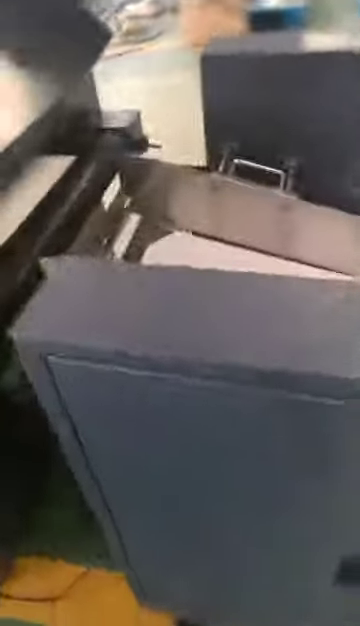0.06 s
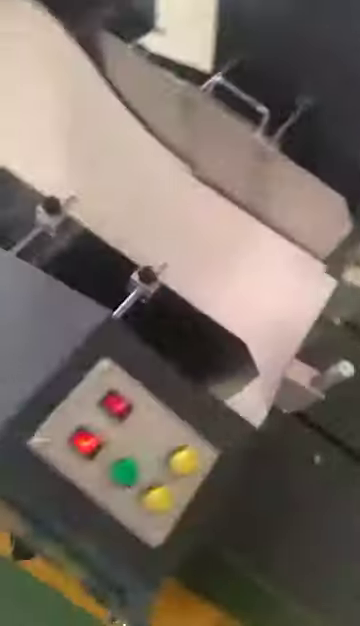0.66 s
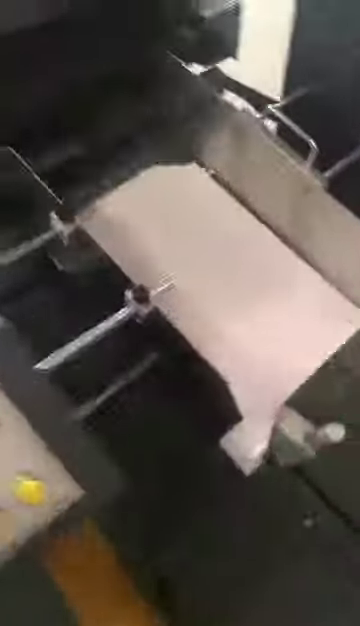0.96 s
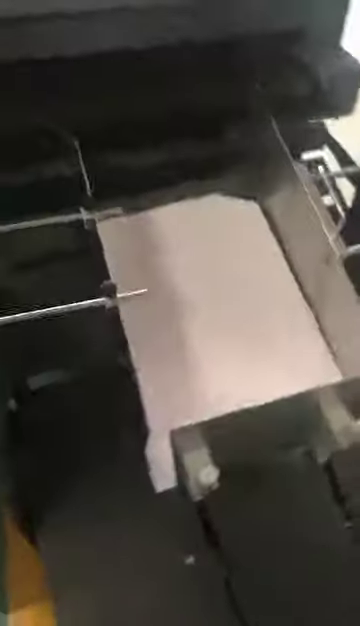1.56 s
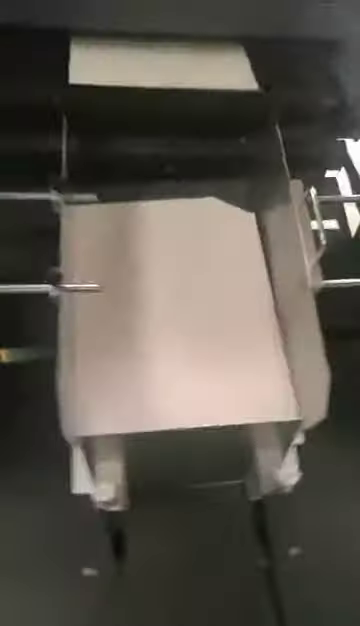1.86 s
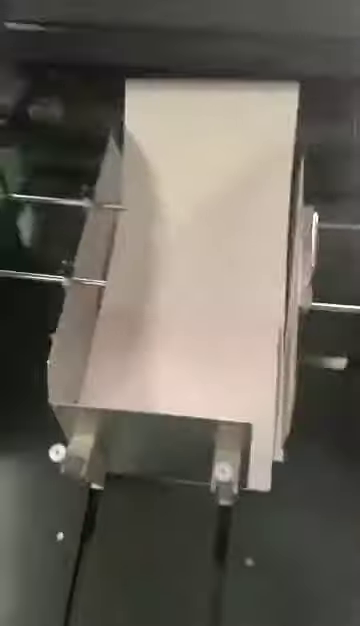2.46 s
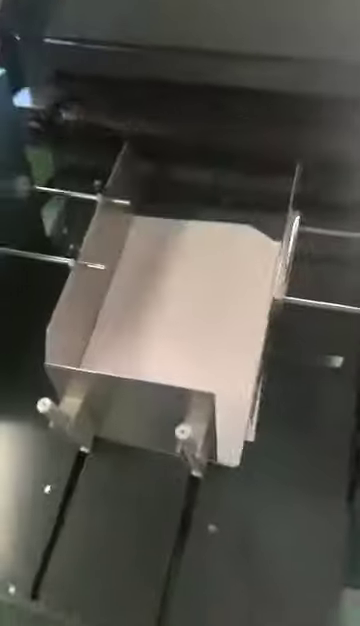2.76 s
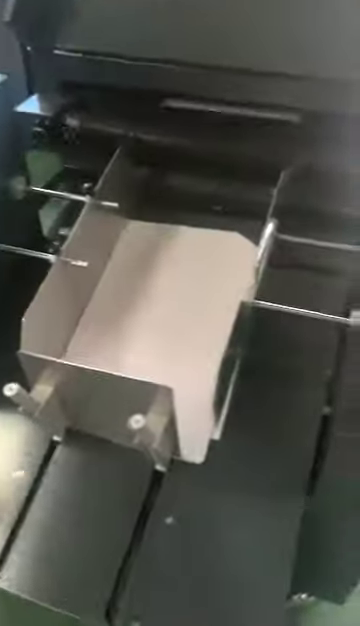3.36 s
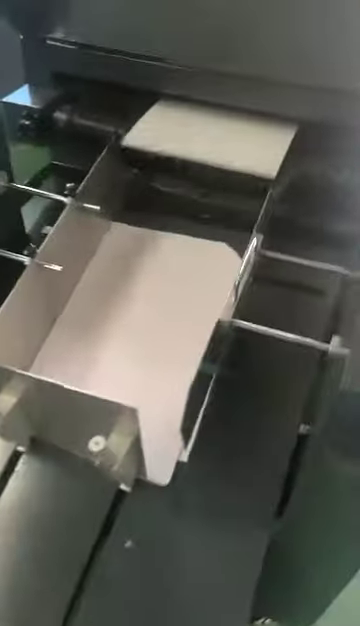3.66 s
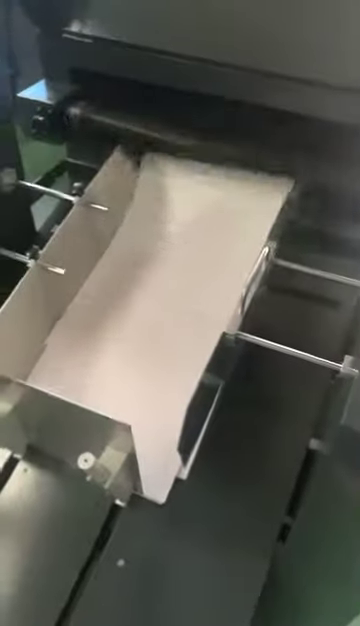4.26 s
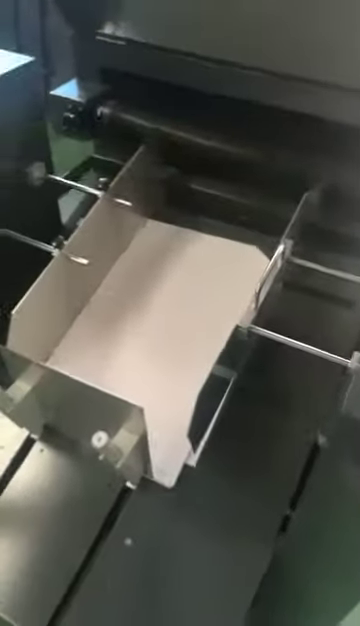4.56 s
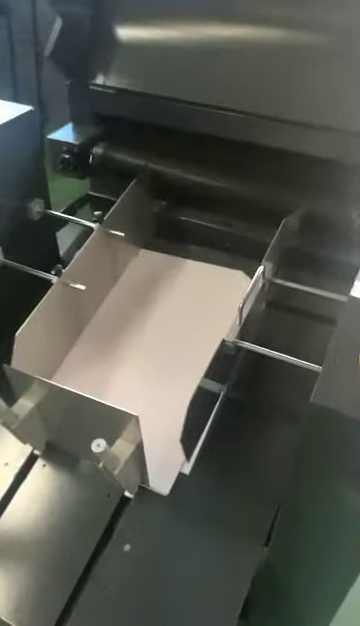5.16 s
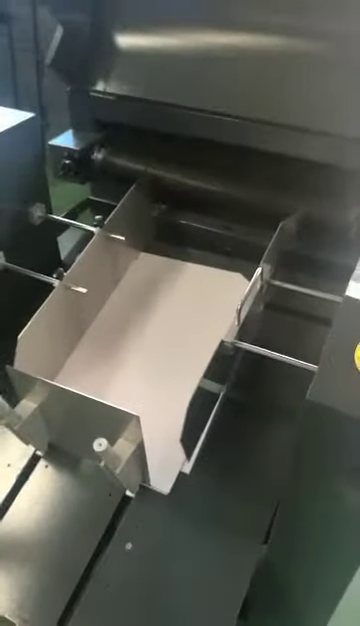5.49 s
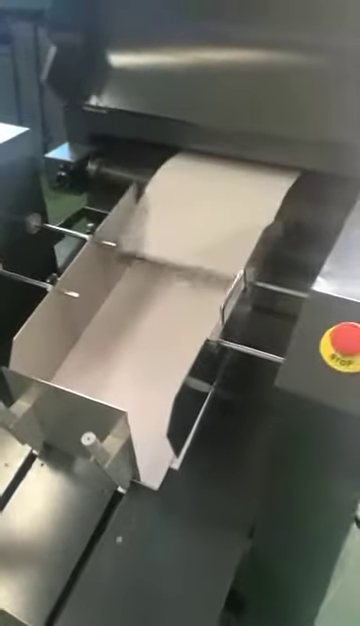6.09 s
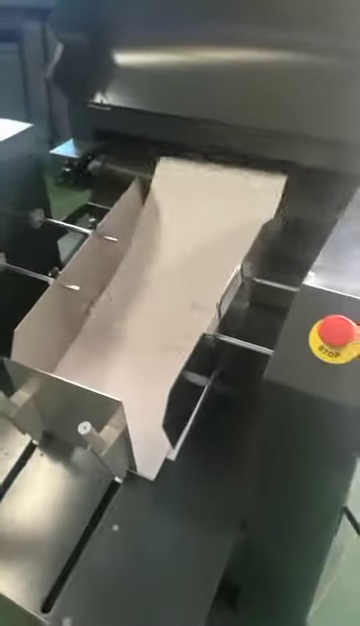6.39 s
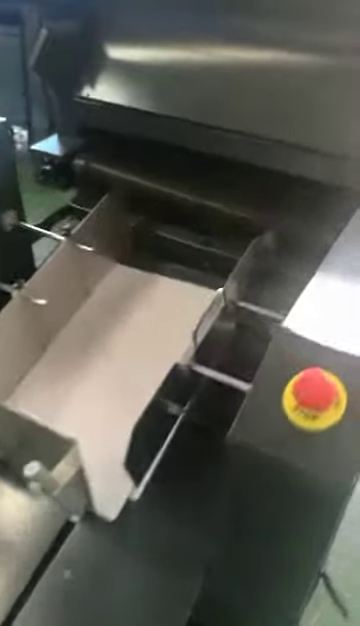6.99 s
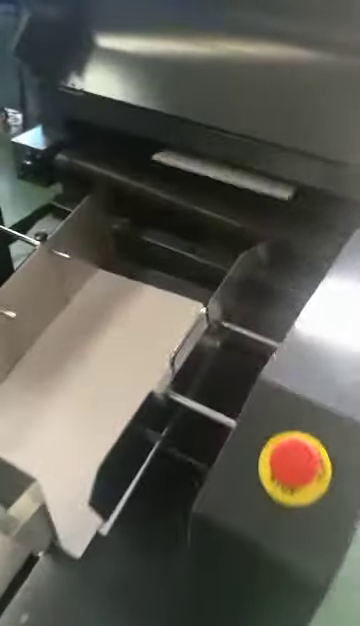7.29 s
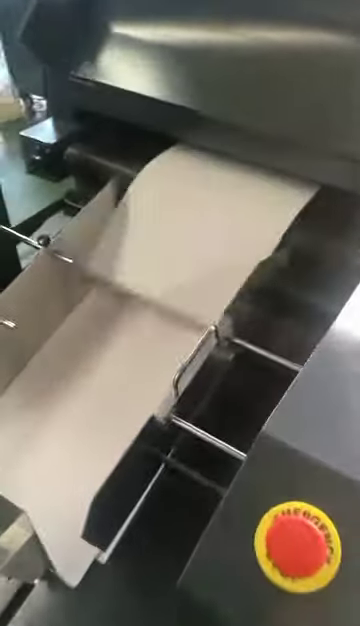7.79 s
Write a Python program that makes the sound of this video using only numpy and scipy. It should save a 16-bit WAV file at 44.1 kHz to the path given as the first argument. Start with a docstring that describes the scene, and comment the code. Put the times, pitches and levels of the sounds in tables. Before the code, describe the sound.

A paper feeding machine runs throughout, heard close up from above its steel tray in a workshop. Rollers rumble, a fan rushes steadily and a motor hums faintly. Five sharp metallic clacks land evenly, at about 0.9, 2.6, 4.3, 6.5 and 8.2 seconds, with one slightly longer gap before the fourth. Each has a brief steel ring and a short room echo; the second is the hardest and the fourth is softer. About 0.7 seconds before each clack, a valve ticks and an air jet starts with a small puff, hissing until the clack while the rumble grows a little. Paper rustles and rasps over the rollers from the start until about 4.4 seconds, and again from 6.6 to 8.3 seconds, with a few bright swishes of sheet on sheet. Light stray ticks are scattered through, and a low drone swells softly near the end.

```python
"""Paper feeder and steel tray

A machine feeds five sheets into a steel tray, heard from a phone just above it. Paper rustles over
the rollers, an air jet hisses while each sheet runs out, and the mechanism clacks against its stop.
The steel rings and the workshop echoes. Underneath, rollers rumble, a fan rushes and a motor hums."""
import sys
import numpy as np
from scipy import signal
from scipy.fft import rfft, irfft, next_fast_len
from scipy.io import wavfile
from scipy.ndimage import uniform_filter1d

SR = 44100
rng = np.random.default_rng(int(sys.argv[2]) if len(sys.argv) > 2 else 0)


def dump(signal):
    """Clip the signal to [-1, 1] and save it as 16-bit WAV at the path in sys.argv[1]."""
    limited = np.clip(np.atleast_2d(signal).T, -1, 1)
    pcm = np.round(limited * 32767).astype(np.int16)
    wavfile.write(sys.argv[1], SR, pcm)


N = 398663
TIME = np.arange(N) / SR
VALVE_OPENS_S, VALVE_SHUTS_S = 0.708, 0.016  # how long before each clack
MIC_LAG_SAMPLES = 26  # direct sound reaches the left microphone later


def gain(db):
    """Turn decibels into a number to multiply by."""
    return 10 ** (np.asarray(db) / 20)


def unit(x):
    """Scale a signal to an average (rms) size of 1."""
    return x / np.sqrt(np.mean(x ** 2))


def at_pitch(table, hz):
    """Read between the rows of a (pitch_hz, value) table."""
    pitches, values = np.transpose(table)
    return np.interp(np.log(np.maximum(hz, 1)), np.log(pitches), values)


def pan(left_db):
    """Two gains that make the left side left_db louder than the right."""
    return gain(np.array([[1], [-1]]) * left_db / 2)


def ramp(t, length_s):
    """Rise from 0 to 1 over length_s, then stay there."""
    return np.clip(t / max(length_s, .001), 0, 1)


def fade(t, fade_s):
    """Die away, losing 60 dB every fade_s."""
    return np.exp(-np.log(1000) * t / max(fade_s, .001))


def swell(peak_s, width_s):
    """A smooth, bell-shaped rise and fall."""
    return np.exp(-((TIME - peak_s) / width_s) ** 2 / 2)


def wobble(rate_hz):
    """Glide between random values about 1 in size."""
    step = int(SR / rate_hz)
    held = np.repeat(rng.standard_normal(N // step + 1), step)
    return unit(uniform_filter1d(held, step)[:N])


# How much louder each pitch is on the left: pitch_hz, left_db
SIDE_BALANCE = [(100, 1), (330, -2), (700, 1.5), (1300, 0), (2800, -3.5), (4500, -2), (7500, 3),
                (14000, 3.5)]
def noise(tone, size=N, shared=0., lag=0, balance=True):
    """Stereo noise with a given tone: part reaches both microphones, part differs at each."""
    n = next_fast_len(size, True)
    hz = np.arange(n // 2 + 1) * SR / n
    white = rfft(rng.standard_normal((3, n)))
    bass = 1 / (1 + (hz / 330) ** 6)  # long waves reach both microphones alike
    share = np.clip(shared + (1 - shared) * bass, 0, 1)
    direct = white[2] * np.exp(-2j * np.pi * np.outer([lag, 0], hz) / SR)
    both = np.sqrt(share) * direct + np.sqrt(1 - share) * white[:2]
    sides = pan(at_pitch(SIDE_BALANCE, hz) * balance)
    return unit(irfft(both * gain(at_pitch(tone, hz)) * sides, n)[:, :size])


# The feed that leads up to each clack:
# jet_db, jet_drop_db, jet_left_db, duct_db, valve_db, flick_db, latch_db, load_db, spit_db
SHEET_FEEDS = [(-35.5, 0.5, 5.3, -45, -42, -28.5, -37, 5.3, -30),
               (-29.5, 7.6, 1.5, -45.5, -28, -29.5, -37, 1.6, -30),
               (-33, 6.5, 1, -46.5, -34, -32, -42, 3.1, -36),
               (-36.5, 4, 2.5, -49.5, -44, -33, -28.5, 1.3, -38),
               (-32.5, 4.6, 1.5, -47, -33, -28, -27.5, 0.87, -30)]
def feeds():
    """Each feed's row, with the time of its clack in front."""
    return [(blow[0], *feed) for blow, feed in zip(BLOWS, SHEET_FEEDS)]


# Fan and rumble are louder where the phone is nearer: time_s, level_db
BACKGROUND_LEVEL = [(0, -36.5), (1.3, -38), (2.3, -35.5), (3.3, -41), (4.4, -39.5), (5.75, -40.5),
                    (6.6, -39.5), (7.3, -35.5), (8.3, -34.5), (8.62, -36.5), (9.04, -34)]
def background_db():
    """The level that the fan and the rumble both follow."""
    return np.interp(TIME, *np.transpose(BACKGROUND_LEVEL))


# The rollers' deep tone: pitch_hz, level_db
RUMBLE_TONE = [(20, -32), (45, -15), (75, -11.5), (100, -3), (165, 0), (230, -1), (310, -4.5), (400, -11),
               (600, -35), (1200, -44)]
def roller_rumble(idle_db=-6, throb_db=0.83, take_up_s=0.19, let_go_s=0.16):
    """Rollers rumble all the time, and harder while they pull a sheet."""
    load_db = 0
    for clack_s, *_, extra_db, _ in feeds():
        taken_up = ramp(TIME - clack_s + VALVE_OPENS_S, take_up_s)
        let_go = ramp(TIME - clack_s + VALVE_SHUTS_S, let_go_s)
        load_db += extra_db * taken_up * (1 - let_go)
    return noise(RUMBLE_TONE) * gain(background_db() + idle_db + load_db + throb_db * wobble(10))


# Swells of a low drone: peak_s, level_db, pitch_hz, width_s
DRONE_SWELLS = [(.72, -46.5, 175, 0.17), (6.12, -45.5, 215, .09), (7.7, -44, 170, 0.23),
                (8.22, -42, 168, 0.15), (8.9, -47, 170, .12)]
def drone():
    """A low drone comes and goes."""
    out = 0
    for peak_s, db, hz, width_s in DRONE_SWELLS:
        tone = [(hz / 4, -90), (hz / 1.45, -30), (hz, 0), (hz * 1.6, -30), (hz * 4, -90)]
        out += noise(tone) * gain(db) * swell(peak_s, width_s)
    return out


# The fan's rushing tone: pitch_hz, level_db
FAN_TONE = [(150, -28), (400, 1.5), (650, -1.5), (950, 2), (1400, 3.5), (1750, 2.5), (1880, 5), (2050, 1),
            (3000, -1), (4700, -2), (8000, -8), (16000, -13)]
def fan(flutter_db=1.04):
    """The fan pushes air with a slightly fluttering rush."""
    rush = noise(FAN_TONE, shared=0.16, lag=MIC_LAG_SAMPLES)
    return rush * gain(background_db() + flutter_db * wobble(15))


# The motor's notes: pitch_hz, level_db
MOTOR_NOTES = [(50, -72), (100, -56), (301, -58.5), (1879, -60.5)]
def motor_hum(waver_db=2.0):
    """The motor hums a few pure notes that waver a little."""
    out = 0
    for hz, db in MOTOR_NOTES:
        level = gain(db + waver_db * wobble(5.7))
        out += level * unit(np.sin(2 * np.pi * hz * TIME + .5 * wobble(7.2)))
    return out


# The tone of sliding paper: pitch_hz, level_db
PAPER_TONE = [(300, -16), (800, -26), (1300, -4.5), (1900, -2.5), (2900, 0), (4000, -0.5), (5200, -2.5),
              (7500, -9.5), (11000, -16.5), (16000, -30)]
# Runs over the rollers: start_s, end_s, level_db, speed_up_s, drop_db, coast_db_per_s
PAPER_RUNS = [(-.3, 0.873, -37.5, 0.83, -0.5, 41), (0.963, 2.418, -36, 0.26, -2, 46),
              (2.893, 4.38, -43, 0.033, -8, 20), (6.648, 8.3, -31.5, 0.42, 12.5, 16)]
# Rasps of tight paper: start_s, end_s, level_db, drop_db, pitch_hz
PAPER_RASPS = [(0.206, 0.447, -34, 5, 3540), (1.489, 1.62, -35, -3, 3520), (2.119, 2.21, -34.5, 0, 4000),
               (2.895, 3.25, -41.5, 1.5, 4200), (3.512, 3.85, -41, -1.5, 3000), (4.14, 4.336, -37, 0, 3740),
               (6.96, 7.117, -33, 1, 3700), (7.17, 7.402, -34, 3.5, 3300)]
def paper(idle_db=-50.5, grain_db=0.66, drag_db=1.0, rasp_rise_s=0.019, rasp_tail_s=0.068):
    """Fibres catch and slip on the rollers: a grainy rustle that rasps when the paper is tight."""
    power = gain(idle_db) ** 2
    for start_s, end_s, db, speed_up_s, drop_db, coast_db_per_s in PAPER_RUNS:
        sag_db = drop_db * ramp(TIME - start_s, end_s - start_s)
        coast_db = coast_db_per_s * np.maximum(TIME - end_s, 0)
        power += (ramp(TIME - start_s, speed_up_s) * gain(db - sag_db - coast_db)) ** 2
    rustle = noise(PAPER_TONE, shared=0.035, lag=MIC_LAG_SAMPLES) * np.sqrt(power)
    t = np.arange(SR * 3 // 4) / SR
    for start_s, end_s, db, drop_db, hz in PAPER_RASPS:
        tone = [(hz / 6, -40), (hz / 2, -20), (hz * 0.8, 0), (hz * 1.32, 0), (hz * 2, -20), (hz * 4, -40)]
        grip = ramp(t, rasp_rise_s) * gain(db - drop_db * ramp(t, end_s - start_s))
        tail = np.exp(-np.maximum(start_s + t - end_s, 0) / rasp_tail_s)
        add(rustle, start_s, noise(tone, len(t)) * grip * tail)
    return rustle * gain(grain_db * wobble(500) + drag_db * wobble(22))


def add(out, start_s, sound):
    """Mix a sound in, beginning at start_s."""
    i = max(int(start_s * SR), 0)
    out[:, i:i + sound.shape[1]] += sound[:, :max(N - i, 0)]


# The tone of sheet on sheet: pitch_hz, level_db
SWISH_TONE = [(500, -25), (2000, -5), (4500, 0), (8000, 4), (11000, -5.5), (16000, -14)]
# Sheets skimming off the stack: peak_s, level_db, width_s
SKIMS = [(1.634, -37.5, 0.049), (1.835, -38.5, 0.056), (3.046, -42.5, 0.06), (6.995, -42, 0.1)]
def swishes():
    """Sheet rubs on sheet with a bright hiss that swells and fades."""
    return noise(SWISH_TONE) * sum(gain(db) * swell(peak_s, width_s) for peak_s, db, width_s in SKIMS)


# Tones of the jet, its hollow duct, the sheet's flick and the first spit of air: pitch_hz, level_db
JET_TONE = [(200, -9), (600, -12), (1000, -6), (2000, -7), (3200, -1), (5200, 5.5), (7500, 2), (12000, 2.5),
            (15500, 2)]
DUCT_TONE = [(200, -16), (460, -1.5), (570, -6), (730, -1), (950, -3.5), (2500, -29), (6000, -45)]
FLICK_TONE = [(300, -5), (1400, 7), (4000, 8), (7000, 5), (16000, -1)]
SPIT_TONE = [(500, -6), (1500, 4), (3500, 6), (6500, 6), (10000, -7), (16000, -9)]
def air_jet(leak_db=-44, open_s=0.022, close_s=0.016, puff_db=5, puff_s=0.055, flutter_db=0.95):
    """A valve opens with a spit and a hollow puff; the hiss weakens as the pressure falls."""
    # a weak leak hisses until the first blast
    flow = gain(leak_db) * pan(6) * (1 - ramp(TIME - BLOWS[0][0] + VALVE_OPENS_S, open_s))
    hollow, flick, spit = 0, 0, 0
    for clack_s, jet_db, drop_db, left_db, duct_db, _, flick_db, _, _, spit_db in feeds():
        on_s, off_s = clack_s - VALVE_OPENS_S, clack_s - VALVE_SHUTS_S
        age = np.clip(TIME - on_s, 0, off_s - on_s)
        valve = ramp(age, open_s) * np.clip((off_s - TIME) / close_s + .5, 0, 1)
        pressure = valve * gain(-drop_db * age / (off_s - on_s))
        flow += pressure * gain(jet_db) * pan(left_db)
        hollow += pressure * gain(duct_db + puff_db * np.exp(-age / puff_s))
        flick += gain(flick_db) * swell(clack_s - 0.051, 0.014)  # the sheet's tail crosses the jet
        spit_age = np.maximum(age - 0.014, 0)  # air spits just after the valve clicks
        spit += gain(spit_db) * valve * ramp(spit_age, .003) * fade(spit_age, .35)
    jet = noise(JET_TONE, shared=0.048, balance=False) * flow * gain(flutter_db * wobble(40))
    duct = noise(DUCT_TONE, shared=0.91, lag=MIC_LAG_SAMPLES) * hollow * pan(4)
    return jet + duct + noise(FLICK_TONE) * flick + noise(SPIT_TONE) * spit


def contact_tone(hz):
    """The tone of a light touch, strongest around one pitch."""
    return [(hz / 8, -40), (hz / 2, -10), (hz, 0), (hz * 2, -20), (hz * 8, -40)]


# Stray ticks of paper edges and moving parts: start_s, level_db, pitch_hz, fade_s
STRAY_TICKS = [(0.232, -38, 500, 0.14), (0.634, -23, 3580, 0.027), (1.235, -39, 800, .09),
               (4.044, -29, 2300, 0.025), (6.262, -27.5, 4200, 0.015), (6.46, -38, 1500, 0.2),
               (6.856, -38, 1320, 0.2), (7.043, -24, 3500, .02), (7.51, -36.5, 650, 0.27),
               (7.937, -28, 3500, .02)]
def ticks(valve_hz=3180, valve_fade_s=0.068, valve_lead_s=.002):
    """Light touches ring briefly: stray ones, and the valve each time it opens."""
    out, t = np.zeros((2, N)), np.arange(SR // 5) / SR
    valve_ticks = [(clack_s - VALVE_OPENS_S - valve_lead_s, valve_db, valve_hz, valve_fade_s)
                   for clack_s, _, _, _, _, valve_db, *_ in feeds()]
    for start_s, db, hz, fade_s in list(STRAY_TICKS) + valve_ticks:
        add(out, start_s, gain(db) * noise(contact_tone(hz), len(t)) * fade(t, fade_s))
    return out


def latch_squeak(pitch_hz=1326, lead_s=.026, slip_s=0.0036, scrape_db=-5):
    """A latch slips with a tiny, scratchy squeak just before each clack."""
    slip = sum(gain(db) * swell(clack_s - lead_s, slip_s) for clack_s, *_, db, _, _ in feeds())
    scrape = gain(scrape_db) * noise(contact_tone(pitch_hz))
    return slip * (np.sin(2 * np.pi * pitch_hz * TIME) + scrape)


# The notes of the steel frame and tray: pitch_hz, level_db, fade_s, left_db
STEEL_NOTES = [(617, -8, 0.041, 4.5), (680, -5, 0.043, 1.5), (777, -11, 0.1, 12), (905, 0, 0.052, 13.5),
               (1050, -10, 0.022, 7), (1236, 0.5, 0.044, 12.5), (1232, -5.5, 0.055, 6),
               (1335, 0, 0.068, -2), (1695, -16, 0.057, 18), (1875, -3.5, 0.1, -6), (2163, -8.5, 0.099, 2),
               (2280, -6, 0.033, 27), (2423, -9, 0.059, -10), (2556, -4, 0.091, -9), (2800, -3, 0.04, -12),
               (3095, -5, 0.052, -4), (3050, -11.5, 0.055, 19), (3760, -4, 0.046, -9),
               (4006, -11, 0.05, -19), (4040, -18, 0.017, 20), (5440, -15, 0.081, 1)]
# Low notes swing opposite ways at the two microphones, middle ones together: pitch_hz, left_lead_rad
STEEL_PHASES = [(600, 3.5), (900, 2.5), (1220, -0.3), (2100, 0.5), (2700, 1.2), (3800, 1.8)]
def steel_ring(t, blow_tone, stretch, mistune=0.011, spread_rad=0.25, stagger_rad=1.32):
    """Struck steel rings with many notes, each a little behind the one before."""
    out = 0
    for k, (hz, db, fade_s, left_db) in enumerate(STEEL_NOTES):
        detune, skew = rng.standard_normal(2)
        phase = 2 * np.pi * hz * (1 + mistune * detune) * t - k * stagger_rad
        lead = at_pitch(STEEL_PHASES, hz) / 2 + spread_rad * skew
        swing = np.sin([phase + lead, phase - lead])
        out += gain(db + at_pitch(blow_tone, hz)) * pan(left_db) * fade(t, fade_s * stretch) * swing
    return out


# Tones of a clack's ringing panels, thump, snap, high crack and room echo: pitch_hz, level_db
PANEL_TONE = [(200, -32), (520, -12.5), (800, 0), (1300, 2), (2600, 0.5), (4200, -5.5), (6000, -13),
              (9000, -21.5)]
THUMP_TONE = [(25, -24), (190, -1), (430, 0), (900, -17), (2500, -45)]
SNAP_TONE = [(400, -26), (1300, 0), (2600, 3), (3800, 5), (6000, -9), (12000, -31)]
CRACK_TONE = [(1000, -32), (4000, -13), (5600, 9.5), (7800, 3), (11000, 4.5), (16000, 1.5)]
ECHO_TONE = [(150, -12), (480, -7), (750, 1), (1250, 8), (2300, 2.5), (4000, -8), (9000, -47)]
# Blows against the stop: start_s, ring_low_db, ring_mid_db, ring_high_db, ring_top_db,
# ring_stretch (a multiplier), thump_db, crack_db, echo_db, bounce_s, snap_db
BLOWS = [(0.8997, -3, 0.5, -18, -10.5, 0.61, -36, -26, -34, 0.003, -24),
         (2.6082, -8, -3.5, 0.5, -6.5, 0.8, -16.5, -17, -28, 0.0057, -12),
         (4.3131, -12, -23, -18, -12.5, 1.38, -27, -18.5, -40, 0.0057, -11),
         (6.5244, -9, -11, -13.5, -12.5, 0.92, -29, -31, -34, 0.0045, -18),
         (8.2002, -8.5, -18.5, -12.5, -4.5, 1.08, -29, -20.5, -34, .0026, -8)]
def clacks(steel_db=-8, panel_db=-4.5, bounce_db=-13):
    """Each blow snaps, thumps the body, rings frame and panels, bounces once and echoes in the room."""
    out, t = np.zeros((2, N)), np.arange(SR * 3 // 4) / SR
    for start_s, *ring_db, stretch, thump_db, crack_db, echo_db, bounce_s, snap_db in BLOWS:
        # no two blows land alike, so each favours different notes
        blow_tone = list(zip([726, 1170, 2020, 3350], ring_db))
        strength = np.sqrt(np.mean(gain(ring_db) ** 2))
        panel_tone = [(hz, db + at_pitch(blow_tone, hz)) for hz, db in PANEL_TONE]
        panels = gain(panel_db) * strength * noise(panel_tone, len(t)) * fade(t, 0.12 * stretch)
        thump = gain(thump_db) * noise(THUMP_TONE, len(t)) * fade(t, 0.044)
        snap = gain(snap_db) * noise(SNAP_TONE, len(t)) * fade(t, 0.012)
        steel = gain(steel_db) * steel_ring(t, blow_tone, stretch)
        hit = (steel + panels + thump + snap) * (1 - np.exp(-t / 0.00043))
        crack = gain(crack_db) * noise(CRACK_TONE, len(t), balance=False) * pan(7)
        crack *= fade(t, 0.084) * (1 - np.exp(-t / 0.0017))
        echo = gain(echo_db) * noise(ECHO_TONE, len(t)) * fade(t, 0.92) * (1 - np.exp(-t / 0.0014))
        add(out, start_s, hit + crack + echo)
        add(out, start_s + bounce_s, gain(bounce_db) * hit)
    return out


def scene():
    """The whole feeder, from the background to the clacks."""
    background = roller_rumble() + drone() + fan() + motor_hum()
    return background + paper() + swishes() + air_jet() + ticks() + latch_squeak() + clacks()


def record(dry, top_hz=15900):
    """The hardest clacks overload the phone, which also cuts the highest treble."""
    treble_cut = signal.ellip(10, .1, 70, top_hz, fs=SR, output="sos")
    return signal.sosfilt(treble_cut, np.clip(dry, -1, 1))


dry = scene()
out = record(dry)
dump(out)
```